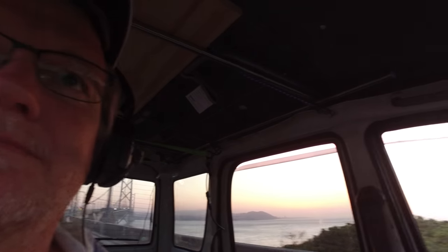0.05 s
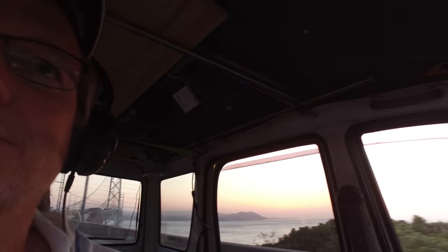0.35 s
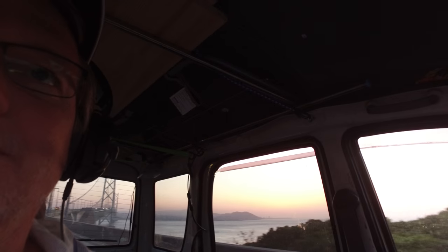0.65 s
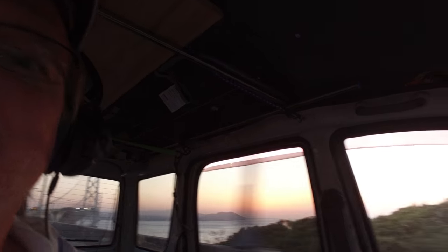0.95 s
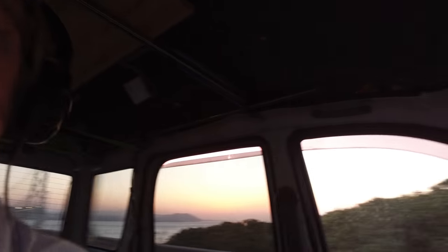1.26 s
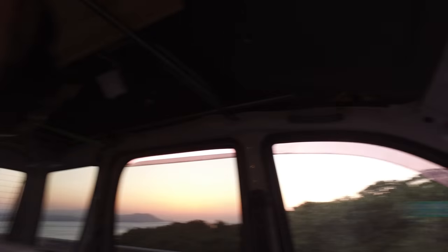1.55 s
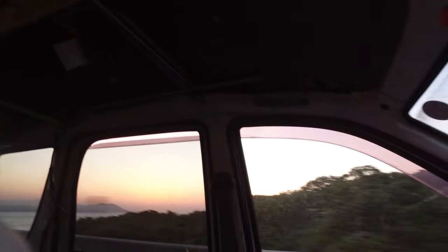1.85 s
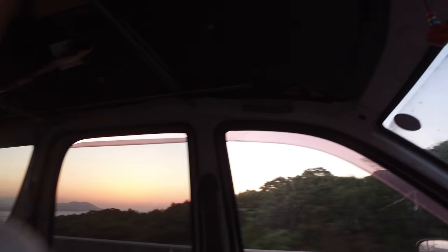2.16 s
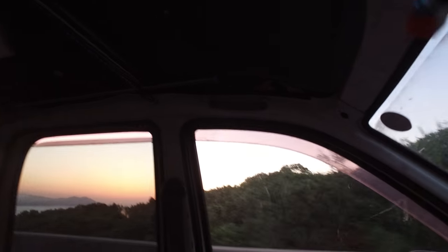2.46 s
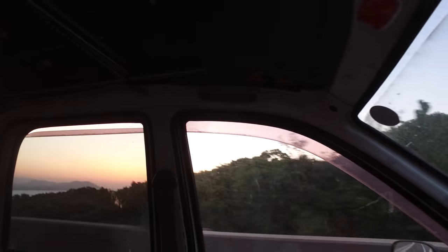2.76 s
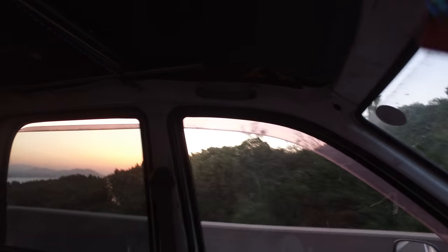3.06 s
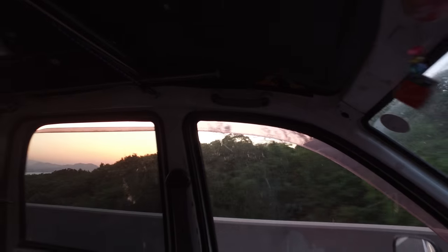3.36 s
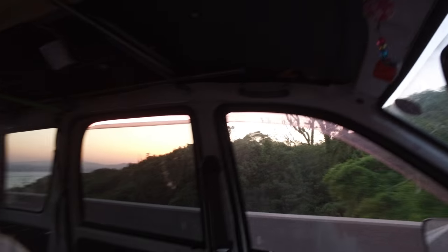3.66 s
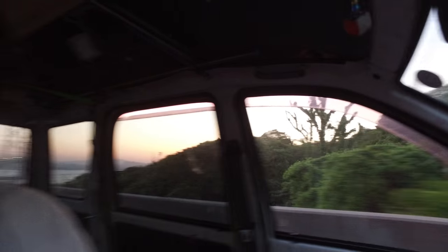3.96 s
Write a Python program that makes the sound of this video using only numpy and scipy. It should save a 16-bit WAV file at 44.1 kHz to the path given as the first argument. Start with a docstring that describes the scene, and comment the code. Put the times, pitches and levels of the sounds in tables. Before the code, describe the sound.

Low engine boom and road rumble fill the cabin of a cruising car, while handling of the microphone adds scattered taps and clicks. Tyre hiss swells past the middle, then the wheels hit joints with a quick double thump.

```python
"""Inside a car cruising along a coast road. The engine booms in the cabin at its firing rate, over
road rumble and tyre roar that brightens along a roadside wall. Near the end the wheels thump over
rough joints and ring the cabin. A hand turning a camera knocks, ticks and rubs on its plastic case.
Trim panels slip with faint squeaks."""
import sys
import numpy as np
from scipy import signal
from scipy.fft import rfft, irfft
from scipy.io import wavfile
from scipy.ndimage import uniform_filter1d

SR = 44100
rng = np.random.default_rng(int(sys.argv[2]) if len(sys.argv) > 2 else 0)


def wav_record(signal):
    """Record a signal, one row per channel, as 16-bit PCM in the file named by sys.argv[1]."""
    frames = np.transpose(np.atleast_2d(signal))
    bounded = np.clip(frames, -1, 1)
    # unit amplitude maps onto the largest positive 16-bit level
    quanta = np.round(bounded * 32767).astype(np.int16)
    wavfile.write(sys.argv[1], SR, quanta)


N = 176400
TIME = np.arange(N) / SR


def engine():
    """Two firings per crank turn boom in the cabin; weaker crank orders waver around the boom."""
    # Each row: time in seconds, firing rate in Hz.
    firing_hz = [(0, 65.16), (.8, 65.2), (1.6, 64.45), (2.0, 63.8), (2.9, 63.75), (3.5, 63.13), (4, 62.4)]
    # Each row: time in seconds, relative boom level in dB.
    boom_db = [(0, -30.5), (.3, -36), (.42, -27), (.56, -30.5), (.66, -33.5), (.8, -28), (.99, -36),
               (1.22, -29), (1.42, -30), (1.55, -35), (1.68, -28.5), (1.78, -35), (1.9, -28.5),
               (2.1, -31.5), (2.33, -32.5), (2.5, -31), (2.65, -36), (2.75, -28), (2.92, -30.5),
               (3.1, -31.5), (3.4, -28.5), (3.5, -35.5), (3.67, -27), (3.78, -36), (3.9, -26), (4, -45)]
    # Each row: multiple of the crank rate, level in dB.
    order_db = [(1, -60.5), (3, -51), (4, -52), (5, -54.5), (6, -48.5), (7, -54.5)]
    crank_rad = np.pi * np.cumsum(curve(firing_hz)) / SR
    tone = amp(curve(boom_db) - 2.27) * np.sin(2 * crank_rad)
    for order, db in order_db:
        gain = amp(db + 2.8 * drift(rate_hz=2.9))
        tone += gain * np.sin(order * crank_rad + 0.92 * drift(rate_hz=5.0))
    return np.sqrt(2) * tone


def road():
    """Rumble through the body, tyre roar, hiss thrown back from the roadside, and steady air."""
    # Noise spectra. Each row: frequency in Hz, relative density in dB.
    rumble_spectrum = [(10, -15), (25, 6), (45, -0.5), (62, 3), (82, -9), (115, -1.5), (150, -3.5),
                       (175, -9), (210, -4), (270, -16), (400, -18), (800, -63.5)]
    roar_spectrum = [(100, -16), (235, -1), (285, -2.5), (320, 0), (355, -1.5), (420, 3), (480, -5),
                     (590, -2.5), (800, -8), (1020, -10.5), (1250, -20.5), (1700, -26.5), (2200, -21),
                     (3000, -40), (5000, -56.5)]
    hiss_spectrum = [(450, -9), (700, -0.5), (1020, 18.5), (1350, -7.5), (1700, 6), (2400, 4.5),
                     (2750, 0.5), (3200, -7), (4200, -10), (4850, -14), (5800, -8.5), (7500, -3.5),
                     (9000, -3.5), (10500, -5.5), (11300, -11), (13000, -13), (15000, -5.5)]
    air_spectrum = [(1000, -36), (1600, 9), (2150, 3.5), (3000, -7.5), (4000, -3.5), (4450, -2.5),
                    (4900, -10.5), (5400, -5.5), (5850, 1), (6500, -5.5), (7800, -2.5), (8700, 1.5),
                    (9700, 7.5), (10400, -4), (11200, -10), (13000, -6), (15000, 0)]
    # Level curves. Each row: time in seconds, level in dB.
    rumble_db = [(0, -34.5), (1.0, -34.5), (1.2, -34), (1.5, -35), (2.3, -36.5), (2.7, -36), (3.2, -33.5),
                 (3.5, -37), (3.66, -34), (3.74, -24.5), (3.83, -31.5), (3.9, -29), (4, -30)]
    roar_db = [(0, -44.5), (.8, -42.5), (1.4, -41.5), (1.85, -39), (2.3, -39), (2.8, -41), (3.15, -42.5),
               (3.55, -41.5), (3.75, -41), (4, -44.5)]
    hiss_db = [(0, -85), (1.4, -62.5), (1.8, -59.5), (2.05, -57.5), (2.35, -50.5), (2.6, -48), (2.85, -49),
               (3.2, -54.5), (3.42, -52.5), (3.6, -62), (3.85, -57), (4, -65)]
    rumble = wash(rumble_spectrum, patchy_db=2.14, size=4096) * amp(curve(rumble_db))
    roar = wash(roar_spectrum, patchy_db=1.68, size=2048)
    roar *= amp(curve(roar_db) + 0.45 * drift(rate_hz=23))
    hiss = wash(hiss_spectrum, patchy_db=2.2, size=1024)
    hiss *= amp(curve(hiss_db) + 0.5 * drift(rate_hz=8.0))
    air = wash(air_spectrum, patchy_db=2.2, size=1024) * amp(-60)
    return rumble + roar + hiss + air


def joint_thumps():
    """Each road joint rings the low modes of the cabin."""
    # Each row: start in seconds, level in dB.
    joints = [(3.698, -48), (3.745, -41), (3.857, -15), (3.907, -20)]
    # Each row: frequency in Hz, relative level in dB, T60 in seconds.
    cabin_modes = [(59.8, 1.5, 0.35), (118.7, -7.5, 0.17), (162, -13, 0.12), (204, -8, 0.081),
                   (396, -27, 0.1), (598, -20.5, 0.079)]
    out, t = np.zeros(N), TIME[:SR // 2]
    thump = ring(cabin_modes, t) * (1 - np.exp(-t / 0.0023))
    for start_s, db in joints:
        add(out, start_s, amp(db) * thump)
    return out


def finger_knocks():
    """A fingertip pushes the case through a few cycles, leaving a hollow ring and a faint rattle."""
    # Each row: start in seconds, level in dB, pitch in Hz.
    knocks = [(0.1283, -19, 786), (.2390, -31, 1080), (.263, -39, 1050), (0.2992, -18.5, 680),
              (1.2148, -17, 765), (1.3309, -31, 1310), (1.6040, -22.5, 740), (2.5043, -22, 820),
              (2.553, -34, 1380), (3.4059, -36, 1530), (3.585, -39, 1500), (3.5945, -28.5, 1250),
              (3.711, -36, 1160), (3.731, -32.5, 1080), (3.775, -30.5, 900), (3.8, -24, 745),
              (3.805, -28, 990)]
    # Each row: frequency in Hz, relative level in dB, T60 in seconds.
    case_modes = [(367, -27, 0.037), (840, -26.5, 0.011), (1640, -20, 0.0093), (2430, -22, 0.0045)]
    rise_s, rattle_decay_s = 0.0011, 0.003
    out, t = np.zeros(N), TIME[:2048]
    rise = t / rise_s
    after_peak_s = np.maximum(t - rise_s, 0)
    hollow = ring(case_modes, after_peak_s)
    for start_s, db, hz in knocks:
        push = (rise * np.exp(1 - rise)) ** 3.55 * np.sin(2 * np.pi * hz * (t - rise_s))
        rattle = case_noise(hz, width_oct=0.9, skirt_db=-27)[:len(t)]
        rattle *= np.minimum(rise, 1) * np.exp(-after_peak_s / rattle_decay_s)
        add(out, start_s, amp(db) * (push + hollow + amp(-22) * rattle))
    return out


def case_ticks():
    """The plastic slips under the grip with a snap that dies within milliseconds."""
    # Each row: start in seconds, level in dB, band centre in Hz, relative skirt level in dB.
    ticks = [(0.2383, -34, 13000, -10), (0.2973, -26, 10800, -12), (.3020, -30.5, 10300, -3),
             (1.0524, -25, 4940, -17), (1.3330, -25, 8400, -8), (1.3408, -30, 11500, -2),
             (3.362, -39, 2900, -20), (3.3620, -24, 13000, -14), (3.4066, -38, 2000, -24),
             (3.4515, -26.5, 9900, -23), (3.594, -34, 11000, 15)]
    decay_s, tail_s = 0.0012, 0.01
    out, t = np.zeros(N), TIME[:2048]
    envelope = np.exp(-t / decay_s) + amp(-30) * np.exp(-t / tail_s)
    for start_s, db, hz, skirt_db in ticks:
        snap = case_noise(hz, width_oct=0.62, skirt_db=skirt_db)[:len(t)]
        add(out, start_s, amp(db) * snap * envelope)
    return out


def hand_rubs():
    """Fingers and sleeve slide on the case: friction hiss with small catches swells and dies away."""
    # Each row: start, rise and decay in seconds, level in dB, band centre in Hz, relative skirt in dB.
    rubs = [(0.309, 0.062, 0.02, -55, 3400, -4), (1.056, 0.0054, 0.024, -52.5, 3200, -22),
            (1.211, 0.018, .06, -51, 15000, -15), (1.51, 0.08, 0.022, -52, 12800, -28),
            (1.6, 0.037, 0.025, -49.5, 10000, 6), (1.69, 0.038, 0.042, -53.5, 14000, -22),
            (1.795, 0.038, 0.022, -53.5, 11100, -12), (2.53, 0.04, 0.047, -46.5, 11000, 13),
            (3.06, 0.026, 0.017, -46, 14080, 0), (3.384, 0.024, 0.059, -50.5, 1790, -2),
            (3.447, 0.01, 0.05, -38.5, 11100, -4), (3.611, 0.032, 0.041, -47.5, 15130, 5),
            (3.682, 0.084, 0.044, -41, 16000, -13), (3.769, 0.0033, 0.0081, -37, 7050, 0),
            (3.796, 0.0034, 0.016, -35.5, 6800, 5), (3.861, 0.018, 0.027, -45.5, 9250, 12)]
    catches_per_s, catch_decay_s, crackle_db = 270, 0.00099, -6.5
    out = np.zeros(N)
    for start_s, rise_s, decay_s, db, hz, skirt_db in rubs:
        hiss = case_noise(hz, width_oct=0.53, skirt_db=skirt_db)
        t = TIME[:len(hiss)]
        catches = (rng.random(len(t)) < catches_per_s / SR) * rng.standard_normal(len(t))
        crackle = unit(signal.fftconvolve(catches, hiss * np.exp(-t / catch_decay_s))[:len(t)])
        slide = unit(hiss + amp(crackle_db) * crackle)
        envelope = np.minimum(t / rise_s, 1) * np.exp(-np.maximum(t - rise_s, 0) / decay_s)
        add(out, start_s, amp(db) * slide * envelope)
    return out


def trim_squeaks():
    """Trim panels slip against each other with a brief, narrow band of noise."""
    # Each row: start in seconds, length in seconds, level in dB, pitch in Hz.
    squeaks = [(.722, .024, -70, 5600), (1.098, .022, -66, 5930), (1.128, 0.021, -62, 3330),
               (1.42, .028, -68, 7200), (1.45, 0.023, -69, 5700), (2.188, .02, -65, 5700)]
    out, hz = np.zeros(N), np.fft.rfftfreq(4096, 1 / SR)
    for start_s, length_s, db, pitch_hz in squeaks:
        spectrum = band(hz, pitch_hz, width_oct=0.11) * np.exp(2j * np.pi * rng.random(len(hz)))
        squeak = irfft(spectrum)[:round(length_s * SR)]
        add(out, start_s, amp(db) * unit(squeak * np.hanning(len(squeak))))
    return out


def case_noise(centre_hz, width_oct, skirt_db, size=16384):
    """Noise in the colour of the case: one band on a broad skirt, rms 1."""
    # Each row: frequency in Hz, relative density in dB.
    case_spectrum = [(200, -5), (600, -28), (1100, 13.5), (1700, 9.5), (2400, 8.5), (3100, -0.5),
                     (4000, -4), (4850, -10), (5900, 3.5), (7000, 0.5), (9400, 1.5), (11200, -4.5),
                     (13000, -6), (15000, 4)]
    hz = np.fft.rfftfreq(size, 1 / SR)
    lift = amp(skirt_db) + band(hz, centre_hz, width_oct)
    return unit(irfft(rfft(rng.standard_normal(size)) * amp(spectrum_db(case_spectrum, hz)) * lift))


def wash(spectrum, patchy_db, size):
    """Coloured noise with small random patches in time and frequency, rms 1."""
    frames = dict(nperseg=size, noverlap=size * 3 // 4)
    hz, _, bins = signal.stft(rng.standard_normal(N), SR, **frames)
    patches = uniform_filter1d(rng.standard_normal(bins.shape), size=5, axis=0)
    patches = unit(uniform_filter1d(patches, size=6, axis=1))
    bins *= amp(spectrum_db(spectrum, hz)[:, None] + patchy_db * patches)
    return unit(signal.istft(bins, **frames)[1][:N])


def ring(modes, t):
    """Sum of decaying sines."""
    return sum(amp(db - 60 * t / t60_s) * np.sin(2 * np.pi * hz * t) for hz, db, t60_s in modes)


def drift(rate_hz):
    """Smooth random wander, rms 1."""
    hz = np.fft.rfftfreq(N, 1 / SR)
    return unit(irfft(rfft(rng.standard_normal(N)) * np.exp(-(hz / rate_hz) ** 2) * (hz > 0), N))


def band(hz, centre_hz, width_oct):
    """Gaussian gain over log frequency."""
    return np.exp(-0.5 * (np.log2((hz + 1) / centre_hz) / width_oct) ** 2)


def spectrum_db(points, hz):
    """Spectrum interpolated over log frequency."""
    point_hz, db = np.transpose(points)
    return np.interp(np.log(hz + 1), np.log(point_hz), db)


def curve(points):
    """Control curve at every sample."""
    return np.interp(TIME, *np.transpose(points))


def amp(db):
    """Decibels to gain."""
    return 10 ** (np.asarray(db) / 20)


def unit(x):
    """Scales to rms 1."""
    return x / np.sqrt(np.mean(x ** 2) + 1e-20)


def add(mix, start_s, sound):
    """Mixes a sound in place."""
    part = mix[max(round(start_s * SR), 0):][:len(sound)]
    part += sound[:len(part)]


def scene():
    """Car and hand, mono."""
    car = engine() + road() + joint_thumps() + trim_squeaks()
    hand = finger_knocks() + case_ticks() + hand_rubs()
    return (car + hand)[None]


def record(dry):
    """The microphone port partly cancels a narrow band; a low-pass limits the treble."""
    port_hz, notch_depth, cutoff_hz = 4820, 0.45, 15400
    notched = signal.lfilter(*signal.iirnotch(port_hz, Q=7.7, fs=SR), dry)
    coloured = dry + notch_depth * (notched - dry)
    lowpass = signal.firwin(401, cutoff_hz, window=("kaiser", 8), fs=SR)
    return signal.oaconvolve(coloured, lowpass[None], "same")


dry = scene()
out = record(dry)
wav_record(out)
```